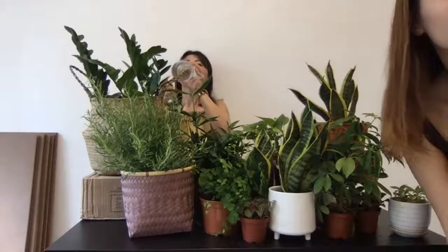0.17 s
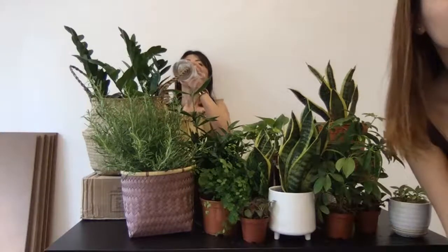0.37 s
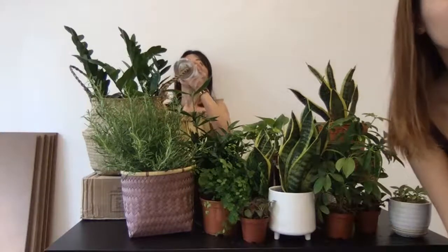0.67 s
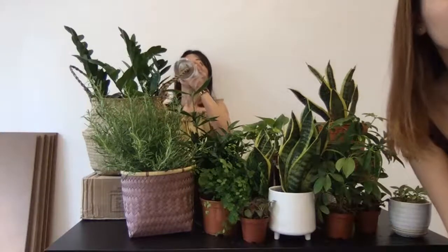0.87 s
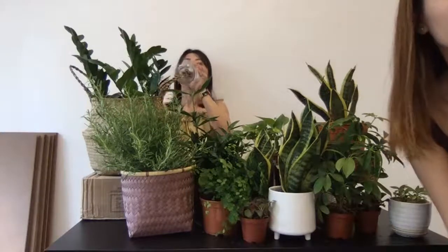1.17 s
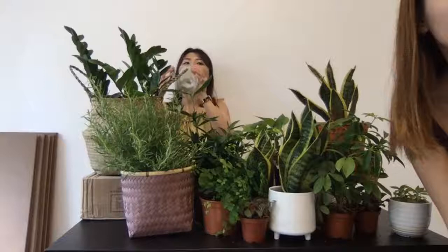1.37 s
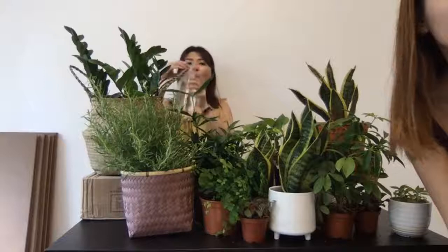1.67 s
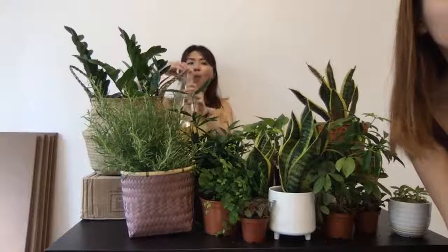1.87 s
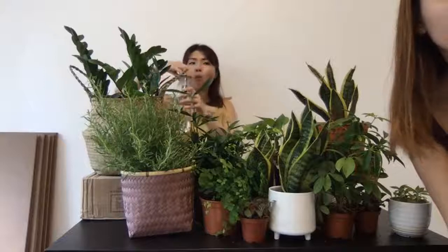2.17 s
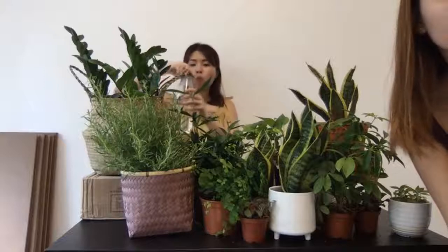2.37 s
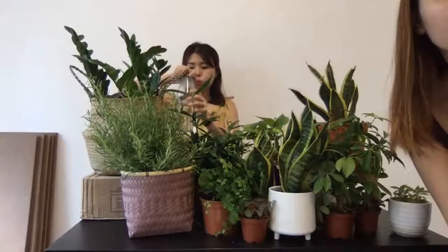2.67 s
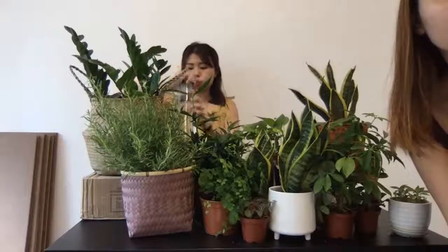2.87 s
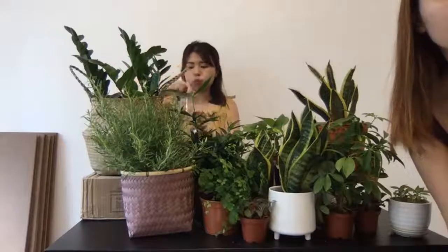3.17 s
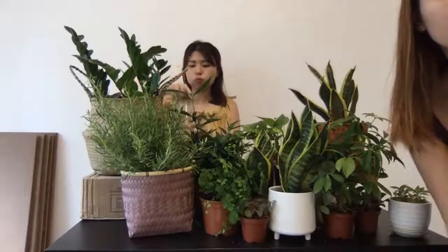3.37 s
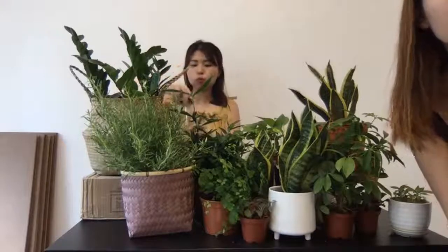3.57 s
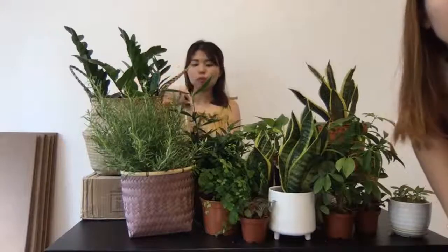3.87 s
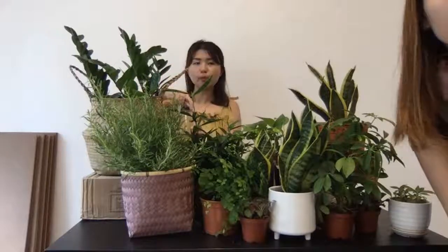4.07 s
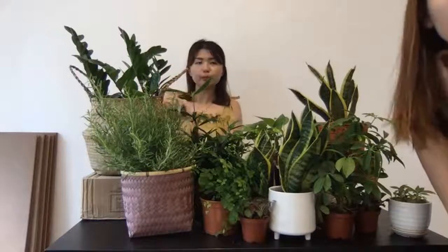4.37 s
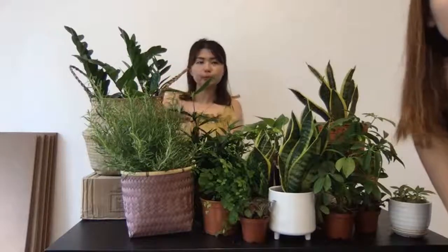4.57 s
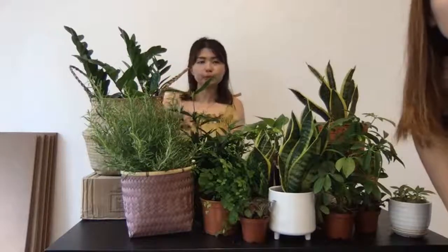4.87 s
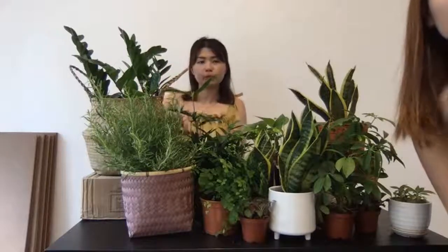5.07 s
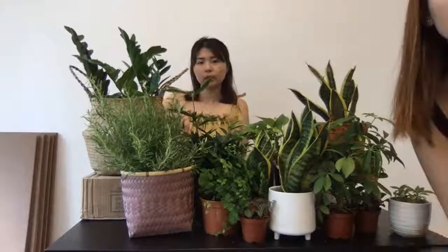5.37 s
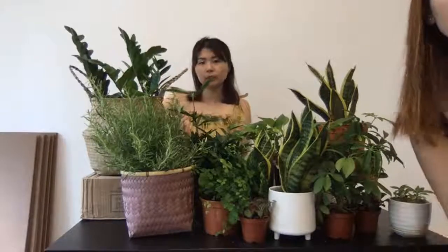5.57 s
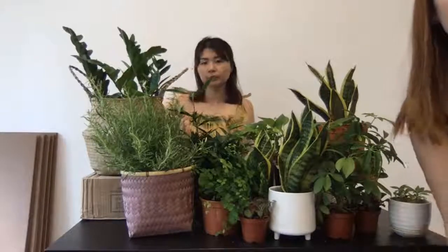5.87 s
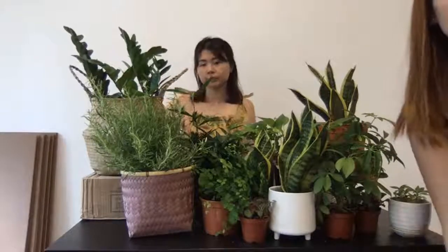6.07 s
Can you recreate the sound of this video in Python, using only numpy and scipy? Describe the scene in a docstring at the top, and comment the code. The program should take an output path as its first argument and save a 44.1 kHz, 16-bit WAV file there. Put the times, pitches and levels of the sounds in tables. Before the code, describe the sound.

In a bare room, a drinking glass is handled with squeaks and clinks, set down ringing twice, then a booming table knock follows.

```python
"""You hear fingers squeak on a large drinking glass, then soft bumps and clinks, in a bare, lively room.
The glass is set down on a table twice: its wall shakes, so it rattles and rings until a hand stills it.
A hard knock makes the table top boom; hollow taps on the hand-damped glass and thin snaps follow.
A low stir and a faint rustle lie underneath, and a limiter flattens the loudest blows."""
import sys
import numpy as np
from scipy import signal
from scipy.fft import rfft, irfft, next_fast_len
from scipy.io import wavfile
from scipy.ndimage import uniform_filter1d, minimum_filter1d, map_coordinates

SR = 44100
rng = np.random.default_rng(int(sys.argv[2]) if len(sys.argv) > 2 else 0)


def generate_wav(sig):
    """Save sig (samples, or channels by samples) to the path in sys.argv[1] as 16-bit PCM at SR."""
    pcm = np.round(np.clip(np.atleast_2d(sig).T, -1, 1) * 32767).astype(np.int16)
    wavfile.write(sys.argv[1], SR, pcm)


N = 273640
T = np.arange(SR) / SR  # time after a blow [s]
NOW = np.arange(N) / SR  # time in the scene [s]


def amp(db):
    """Turn decibels into a gain. Table levels are relative: each sound adds its own gain."""
    return 10 ** (np.asarray(db) / 20)


def unit(x):
    """Scale a signal to an average (rms) strength of 1."""
    return x / np.sqrt(np.mean(x ** 2) + 1e-20)


def fade(t, t60):
    """Die away by 60 dB every t60 seconds, the ring time."""
    return amp(-60 * t / np.maximum(t60, 1e-3))


def along(points, hz):
    """Read between (frequency, value) points, spaced by octaves."""
    freqs, values = np.transpose(points)
    return np.interp(np.log(hz + 1), np.log(freqs + 1), values)


def level(rows):
    """Turn (time [s], level [dB]) rows into a gain for every sample."""
    return amp(np.interp(NOW, *np.transpose(rows)))


def add(track, s, sound):
    """Mix a sound into the track at s seconds."""
    part = track[round(s * SR):][:len(sound)]
    part += sound[:len(part)]


def wobble(t, rate):
    """A smooth curve through rate random points a second."""
    return map_coordinates(rng.standard_normal(400), [t * rate], mode="mirror")


def noise(colour, size=N):
    """Steady noise; its colour says how strong each frequency is."""
    padded = next_fast_len(size)
    gain = amp(along(colour, np.fft.rfftfreq(padded, 1 / SR)))
    return unit(irfft(rfft(rng.standard_normal(padded)) * gain, padded)[:size])


def room(direct_db, knee_s=0.1, bend=0.15):
    """The room's answer to a click: the direct sound, then a wash of echoes whose treble dies first."""
    # how long echoes last: (frequency [Hz], ring time before bending [s])
    echo_times = [(150, 0.75), (1000, 0.31), (3000, 0.26), (7000, 0.21), (14000, 0.17)]
    hz, t, bands = signal.stft(rng.standard_normal(SR // 2), SR, nperseg=256)
    bent_time = t * (t / knee_s) ** bend  # the echoes fall ever faster
    tail = signal.istft(bands * fade(bent_time, along(echo_times, hz)[:, None]), SR, nperseg=256)[1]
    tail *= 1 - np.exp(-T[:len(tail)] / 0.00058)
    tail /= np.linalg.norm(tail)
    tail[0] += amp(direct_db)
    return tail / np.linalg.norm(tail)


def contact(colour, bright_db, direct_db, size=8192):
    """One sharp push heard through the room; bright_db lifts its treble, in dB per octave."""
    hz = np.fft.rfftfreq(size, 1 / SR)
    gain = amp(along(colour, hz) + bright_db * np.log2(hz / 1000 + .1))
    # build a click of this colour with nothing sounding ahead of the blow
    cepstrum = irfft(np.log(np.maximum(unit(gain), 1e-6)))
    one_sided = np.r_[1, np.full(size // 2 - 1, 2), np.zeros(size // 2)]
    push = irfft(np.exp(rfft(cepstrum * one_sided)))
    return signal.fftconvolve(push, room(direct_db)) * np.sqrt(.03 * SR)


def ring(modes, bright_db, waver, waver_rate, attack, grip):
    """A struck thing's own tones (modes) fade, choked after grip seconds; echoes make them waver."""
    t = T[T < 2 * grip]
    out = np.zeros(len(t))
    build_up = 1 - np.exp(-t / 0.0067)
    for hz, db, t60 in modes:
        height = hz / modes[0][0]
        depth = waver * min(hz / 2000, 1) ** 2 * build_up  # low tones waver less
        rate = waver_rate * np.sqrt(height)
        phase = 2 * np.pi * hz * t
        tone = (1 + depth * wobble(t, rate)) * np.sin(phase) + depth * wobble(t, rate) * np.cos(phase)
        out += amp(db + bright_db * np.log2(height)) * fade(t, t60) * tone / np.sqrt(1 + depth ** 2)
    return out * (1 - np.exp(-t / max(attack, 1e-4))) * np.exp(-(t / grip) ** 3)


def glassy(colour, modes, overtones=10, gap_hz=523, peak_db=3.5, width_hz=85):
    """Give a colour a peak at each tone of the glass, and at uneven overtones above them."""
    hz = np.fft.rfftfreq(len(T) // 10, 1 / SR)
    tones = [mode[0] for mode in modes]
    centres = np.r_[tones, tones[-1] + gap_hz * np.cumsum(.5 + rng.random(overtones))]
    peaks = np.exp(-((hz[:, None] - centres) / width_hz) ** 2).max(axis=1)
    return np.c_[hz, along(colour, hz) + peak_db * peaks]


def harder_is_brighter(rows, top_db, slope):
    """Give blows a brightness [dB per octave]: top_db for the hardest, slope less per dB below it."""
    hardest = max(db for s, db in rows)
    return [(s, db, top_db + slope * (db - hardest)) for s, db in rows]


def background(stir_db=3, lumpy_db=2, ticks_per_s=260, scatter_db=4, air_db=-78):
    """Movement in the room makes a low stir and a rustle of tiny, uneven ticks over quiet air."""
    # strength of the movement and of the rustle: (time [s], level [dB])
    movement = [(0.0, -66.5), (0.92, -65.5), (1.57, -49.5), (1.67, -42), (1.88, -34.5), (3.35, -49),
                (3.7, -37.5), (4.18, -51), (4.77, -46.5), (5.56, -63), (5.7, -40.5), (6.2, -53)]
    rustle_levels = [(0, -101), (.95, -96.5), (1.55, -65), (1.9, -53.5), (2.6, -59), (3.25, -73.5),
                     (3.7, -63), (4.25, -63.5), (4.85, -57), (5.45, -84.5), (5.7, -62), (6.2, -62)]
    # colours of the stir and of the air: (frequency [Hz], level [dB])
    stir_colour = [(25, -34.5), (59, -20.5), (77, -15), (97, 8), (130, -2), (200, -7.5), (275, -10.5),
                   (358, -24.5), (450, -23), (700, -52), (1500, -89.5)]
    air_colour = [(300, -14), (600, -4.5), (1500, -7.5), (2500, -16.5), (4000, -16), (7500, -25.5),
                  (12000, -29), (16000, -35)]
    stir = level(movement) * amp(stir_db + lumpy_db * wobble(NOW, 18)) * noise(stir_colour)
    ticks = (rng.random(N) < ticks_per_s / SR) * amp(scatter_db * np.minimum(rng.standard_normal(N), 2))
    rustle = unit(signal.fftconvolve(ticks, contact(air_colour, 0, direct_db=-16))[:N])
    return stir + level(rustle_levels) * rustle + amp(air_db) * noise(air_colour)


def squeaks(slip_s=0.041, jitter=0.035, jitter_rate=420):
    """Skin slips on glass: a short tone of unsteady pitch, smeared by the room."""
    # finger slips: (time [s], pitch [Hz], level [dB])
    slips = [(0.560, 5420, -33), (0.566, 9080, -42.5), (0.786, 2890, -59.5), (1.793, 2875, -31.5),
             (1.793, 9100, -50), (1.828, 407, -34), (2.11, 2910, -49.5), (2.618, 5380, -50.5),
             (3.715, 9930, -51), (4.84, 3460, -51.5), (4.875, 2820, -47.5), (4.895, 2028, -45),
             (5.108, 5390, -42.5)]
    out = np.zeros(N)
    t = T[:8192]
    swell = np.sin(np.pi * np.minimum(t / slip_s, 1))
    for s, hz, db in slips:
        pitch = hz * (1 + jitter * wobble(t, jitter_rate))
        slip = swell * np.sin(2 * np.pi * np.cumsum(pitch) / SR)
        add(out, s, amp(db + 2) * signal.fftconvolve(slip, room(direct_db=9)))
    return out


def rubs(rise_s=0.047, t60=1.0):
    """A hand shifts its hold: a rubbing noise swells quickly and dies away."""
    # shifts of the hand: (time [s], level [dB])
    shifts = [(0.591, -45.5), (1.21, -57), (3.838, -46), (4.84, -44.5)]
    # colour of the rubbing: (frequency [Hz], level [dB])
    colour = [(35, -55), (60, -28.5), (117, 5), (199, -19.5), (240, -7), (347, -25), (835, -22),
              (15000, -52.5)]
    out = np.zeros(N)
    for s, db in shifts:
        add(out, s, amp(db) * (1 - np.exp(-T / rise_s)) * fade(T, t60) * noise(colour, size=SR))
    return out


def bumps(hz=137, peak_s=0.0182):
    """Soft, dull bumps all push the same low tone."""
    # soft touches: (time [s], level [dB])
    touches = [(1.074, -37), (1.162, -29.5), (1.206, -23.5), (1.238, -21), (1.484, -28.5), (1.836, -24.5),
               (1.995, -19), (2.031, -18.5), (2.083, -21), (2.433, -23), (3.289, -37.5)]
    out = np.zeros(N)
    swell = (T / peak_s) ** 2 * np.exp(2 - 2 * T / peak_s)
    for s, db in touches:
        add(out, s, amp(db) * swell * np.sin(2 * np.pi * hz * T))
    return out


def clinks():
    """Light touches ring the glass's thick base, then its rim; each starts with a dry chink."""
    # clinks on the base: (time [s], level [dB])
    base_touches = [(1.555, 2), (1.562, -4.5)]
    # faint tings of the rim: (time [s], level [dB], brightness [dB per octave])
    rim_touches = [(1.702, -39, 4), (1.839, -29.5, 3), (1.926, -23, -8), (2.086, -44, -6.5),
                   (2.218, -46.5, 6.5), (2.315, -47, 4), (2.359, -28, 8.5), (3.70, -24, -3.5)]
    # tones of the base and of the rim: (pitch [Hz], level [dB], ring time [s])
    base_tones = [(1174, -23, 0.33), (2100, -21.5, 0.81), (2486, -11.5, 0.52), (2500, -13, 0.64),
                  (2760, 1, 0.38), (2920, -8.5, 0.15), (3060, -21, 0.97), (3630, -18.5, 0.37),
                  (4050, -17.5, 0.25), (4730, -12.5, 0.37), (4920, -9.5, 0.2), (5410, -5.5, 0.24),
                  (8170, -19.5, 0.25), (9340, -17, 0.17), (9700, -16, 0.25)]
    rim_tones = [(2306, -1, 0.29), (2560, 0, 0.25), (3667, 8, 0.22), (5100, -3.5, 0.23), (9130, -10, 0.13),
                 (11180, -15.5, 0.11)]
    # colour of the chink: (frequency [Hz], level [dB])
    colour = [(400, -55), (1100, -14), (1500, -30), (2300, -10), (2650, 0.5), (3050, -13.5), (5400, -24.5),
              (6300, -32.5), (9600, -31), (11000, -31), (16000, -36.5)]
    out = np.zeros(N)
    chink = glassy(colour, base_tones)
    for s, db in base_touches:
        base = ring(base_tones, 0.6, waver=2, waver_rate=120, attack=0.00043, grip=0.68)
        add(out, s, amp(db - 16) * base)
        add(out, s, amp(db - 15.5) * contact(chink, 0.85, direct_db=0))
    for s, db, bright_db in rim_touches:
        rim = ring(rim_tones, bright_db, waver=0.94, waver_rate=190, attack=0.002, grip=0.22)
        add(out, s, amp(db - 10.5) * rim)
        add(out, s, amp(db - 14) * contact(chink, bright_db + 1.5, direct_db=-17.5))
    return out


def clacks():
    """Handled things clack without ringing: mostly the room's answer is heard."""
    # dry clacks: (time [s], level [dB])
    hits = [(2.360, -40.5), (2.366, -24), (2.374, -25.5)]
    # their colour: (frequency [Hz], level [dB])
    colour = [(300, -15), (570, -17), (1000, 3.5), (1400, -13.5), (2400, 0.5), (3700, -8), (4400, -22),
              (5200, -9.5), (7000, -22), (16000, -24)]
    out = np.zeros(N)
    for s, db, bright_db in harder_is_brighter(hits, top_db=0.7, slope=0.51):
        add(out, s, amp(db - 1) * contact(colour, bright_db, direct_db=-7))
    return out


def setting_down(dip_s=4.461, dip_db=-11.5, dip_width_s=0.017):
    """The glass rocks onto the table, which rings its wall and throws a clatter into the room."""
    # the glass strikes the table or its ring swells again:
    # (time [s], ring level [dB], ring brightness [dB per octave], choked after [s], clatter level [dB])
    strikes_and_swells = [(3.427, -5, -0.5, 0.057, -12), (3.434, -10.5, 2, 0.19, -13.5),
                          (3.451, -17, 3.5, 0.054, -23), (3.468, -2, 0, 0.14, -11.5),
                          (3.544, -1, 1.5, 0.14, -4.5), (3.553, -6.5, 3.5, 0.13, -16),
                          (3.593, -13.5, 0, 0.27, -34), (4.321, 8, -6.5, 0.072, -18),
                          (4.328, -5, 1.5, 0.27, -7), (4.480, -9.5, -5.5, 0.1, -32)]
    # tones of the wall, whose strengths depend on which spot of the foot lands:
    # (pitch [Hz], level at spot 1 [dB], at spot 2 [dB], at spot 3 [dB], ring time [s])
    wall_tones = [(885, 1, -1.5, 1, 0.3), (1547, -13.5, -17.5, -13, 0.54), (2336, -2.5, -4, -6, 0.67),
                  (2430, -12.5, -12, -11.5, 0.19), (2630, -22, -19.5, -17, 0.2),
                  (3640, -26.5, -27, -45.5, 0.31), (4240, -14.5, -14.5, -10, 0.051),
                  (4315, -22.5, -21, -10, 0.35), (4534, -12, -14, -13.5, 0.29),
                  (5655, -31.5, -22, -30, 0.4), (6670, -24.5, -28, -23, 0.28),
                  (7550, -32, -33.5, -28, 0.23), (8420, -28, -35, -29.5, 0.21),
                  (9400, -32.5, -35.5, -30.5, 0.34), (9450, -29.5, -30, -40.5, 0.22),
                  (10260, -33.5, -36.5, -34.5, 0.25), (10500, -32.5, -39.5, -44.5, 0.27),
                  (11300, -32.5, -35, -53, 0.16)]
    # the glass tips onto its next spot: (time [s])
    spot_changes = [3.5, 4]
    # colour of the clatter: (frequency [Hz], level [dB])
    colour = [(120, -38.5), (200, -26.5), (430, -19), (640, -20.5), (883, -5), (1200, -14.5), (1870, -16),
              (2330, -18.5), (3100, -27.5), (4860, -26.5), (5630, -31), (16000, -45.5)]
    out = singing()
    clatter = glassy(colour, wall_tones)
    for s, db, bright_db, grip, clatter_db in strikes_and_swells:
        spot = np.searchsorted(spot_changes, s)
        modes = [(hz, spot_db[spot], t60) for hz, *spot_db, t60 in wall_tones]
        add(out, s, amp(db) * ring(modes, bright_db, waver=1.1, waver_rate=55, attack=0.0028, grip=grip))
        add(out, s, amp(clatter_db) * contact(clatter, bright_db / 2, direct_db=-28))
    # the ring dips briefly, then swells back
    return out * amp(dip_db * np.exp(-((NOW - dip_s) / dip_width_s) ** 2))


def singing(hz=881.5, flutter=0.13):
    """Once the glass is down its lowest tone sings on; a hand damps it to a faint hum, then stops it."""
    # long notes: (start [s], level [dB], ring time [s], hand touches at [s])
    notes = [(3.427, -16, 4.6, 4.071), (4.323, -17.5, 5.8, 4.788)]
    out = np.zeros(N)
    t = np.arange(2 * SR) / SR
    for s, db, t60, touched_s in notes:
        held = np.maximum(s + t - touched_s, 0)
        damping = fade(held, 0.53)
        hum = amp(-25.5) * fade(np.maximum(held - .4, 0), 0.59)
        unsteady = 1 + flutter * noise([(20, 3), (300, -17.0), (800, -54.5)], size=len(t))
        tone = np.sin(2 * np.pi * hz * t) * unsteady * fade(t, t60)
        add(out, s, amp(db) * tone * np.maximum(damping, hum))
    return out


def knocks():
    """A hard blow cracks on the wood and sets the table top booming."""
    # blows on the table: (time [s], crack level [dB], brightness [dB per octave], boom level [dB])
    blows = [(3.492, -14, 0.5, -36), (3.551, -17.5, -4, -28), (5.531, -12, -0.5, -17.5),
             (5.535, -8.5, 3.5, -17.5), (5.544, -7.5, 2, -7), (5.620, -29.5, 1, -19)]
    # colour of the crack: (frequency [Hz], level [dB])
    wood = [(59, -58.5), (100, -18.5), (161, -10.5), (202, -14), (248, 0.5), (440, -15), (570, -21.5),
            (1010, -13.5), (2200, -25.5), (2790, -44), (4220, -42.5), (5410, -80.5), (6790, -56.5),
            (7370, -92.5)]
    # tones of the table top: (pitch [Hz], level [dB], ring time [s])
    tones = [(128, -6, 0.41), (167.97, 7, 0.38), (250.4, -5, 0.61), (314, -13.5, 0.53), (386, -18, 0.31),
             (460, -11, 0.11), (471.8, -15.5, 0.43), (708, -2.5, 0.04), (934, -20.5, 0.49),
             (1117, -7.5, 0.21), (1292, -13, 0.14), (2125, -14, 0.2), (3870, -35, 0.2)]
    out = np.zeros(N)
    for s, db, bright_db, boom_db in blows:
        add(out, s, amp(db - 5) * contact(wood, bright_db, direct_db=-12))
        add(out, s, amp(boom_db) * ring(tones, 0, waver=0.25, waver_rate=80, attack=0.0047, grip=0.31))
    return out


def hollow_taps():
    """Hollow taps on the hand-damped glass: a dry push and a quickly choked ring."""
    # taps: (time [s], level [dB])
    taps = [(5.831, -26), (5.865, -31)]
    # tones of the damped glass: (pitch [Hz], level [dB], ring time [s])
    tones = [(769.5, -3.5, 0.45), (853, -0.5, 0.29), (2280, -11, 0.49), (2510, -12.5, 0.25),
             (3600, -22, 0.14), (4300, -10.5, 0.2)]
    # colour of the push: (frequency [Hz], level [dB])
    colour = [(400, -11), (800, -7), (1400, -21.5), (2400, -15.5), (4400, -23), (5500, -34)]
    out = np.zeros(N)
    for s, db in taps:
        add(out, s, amp(db) * ring(tones, 0, waver=10.4, waver_rate=135, attack=0.0059, grip=0.054))
        add(out, s, amp(db - 16) * contact(colour, 0, direct_db=-30))
    return out


def snaps():
    """Thin, dry snaps are heard mostly through the room's echoes."""
    # snaps: (time [s], level [dB])
    hits = [(5.989, -37), (5.998, -24.5), (6.09, -47)]
    # their colour: (frequency [Hz], level [dB])
    colour = [(530, -61), (900, -37), (1340, -24.5), (1700, -1), (2360, -4.5), (2730, 2), (6800, -13.5),
              (7860, -24), (16000, -35)]
    out = np.zeros(N)
    for s, db, bright_db in harder_is_brighter(hits, top_db=4.5, slope=0.43):
        add(out, s, amp(db - 6) * contact(colour, bright_db, direct_db=-10))
    return out


def scene():
    """Everything reaches one microphone."""
    blows = setting_down() + clinks() + clacks() + snaps() + hollow_taps() + knocks() + bumps()
    return (blows + squeaks() + rubs() + background())[None]


def record(dry, ceiling_db=-1.35, release_db_per_s=150, bass_hz=52, top_hz=16050):
    """Cut the deep bass, turn the loudest blows down with a fast limiter, then cut the highest treble."""
    sound = signal.sosfilt(signal.butter(3, bass_hz, "high", fs=SR, output="sos"), dry)
    over_db = np.maximum(20 * np.log10(np.abs(sound[0]) + 1e-9) - ceiling_db, 0)
    recovery = release_db_per_s * NOW
    cut_db = np.maximum.accumulate(over_db + recovery) - recovery  # each cut eases off steadily
    gain = uniform_filter1d(minimum_filter1d(amp(-cut_db), size=65), size=65)  # smooth the gain's jumps
    return signal.sosfilt(signal.ellip(10, .1, 80, top_hz, fs=SR, output="sos"), sound * gain)


dry = scene()
out = record(dry)
generate_wav(out)
```